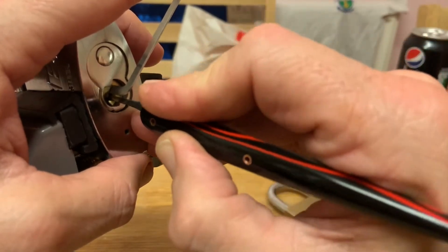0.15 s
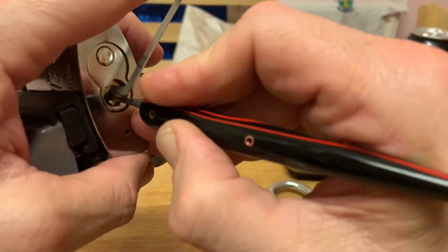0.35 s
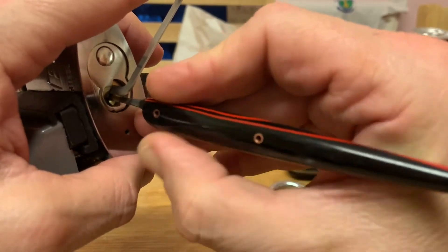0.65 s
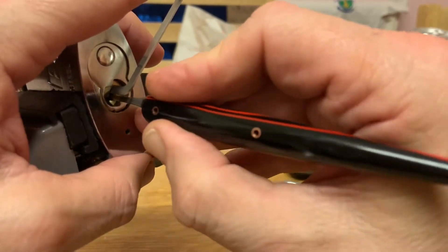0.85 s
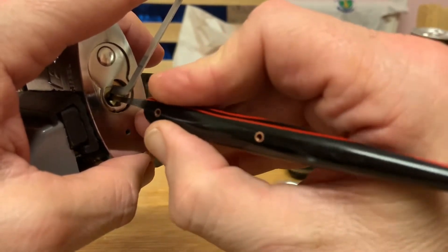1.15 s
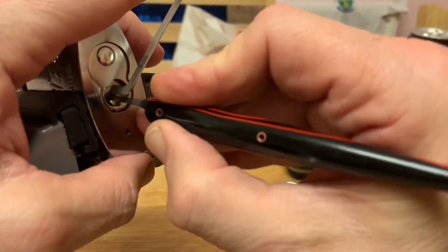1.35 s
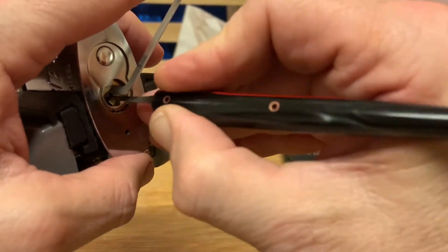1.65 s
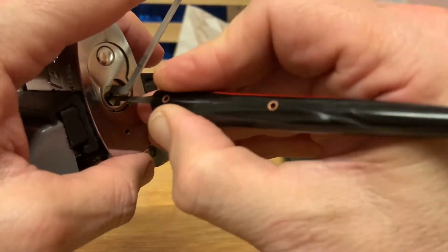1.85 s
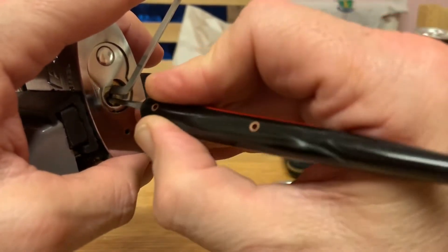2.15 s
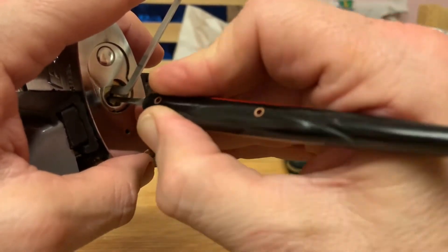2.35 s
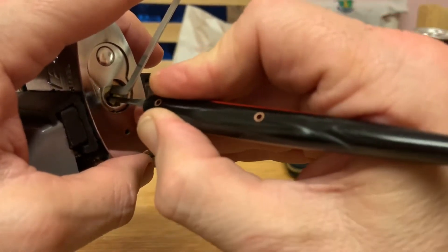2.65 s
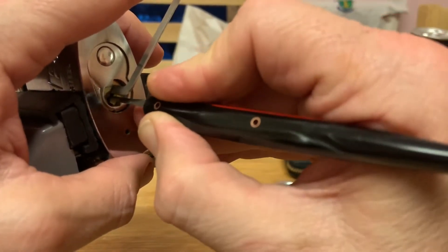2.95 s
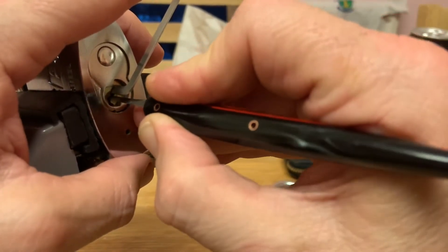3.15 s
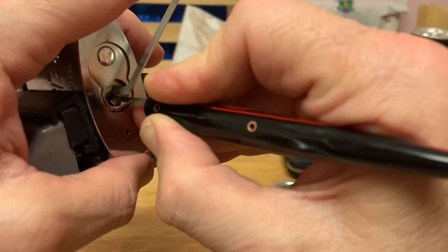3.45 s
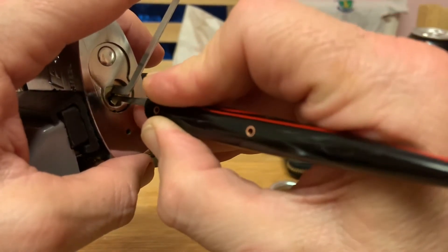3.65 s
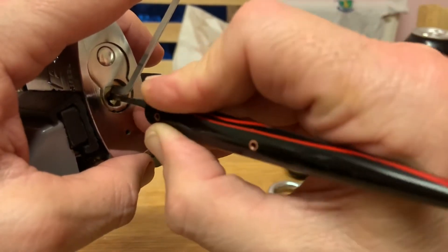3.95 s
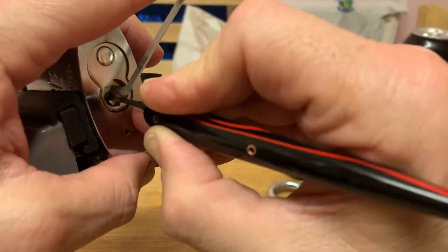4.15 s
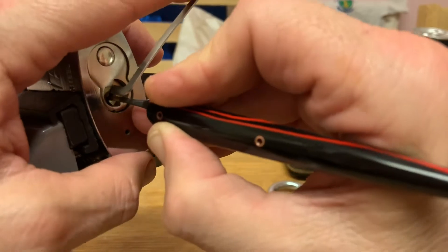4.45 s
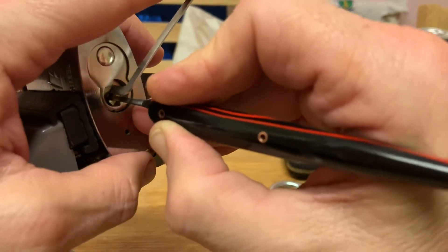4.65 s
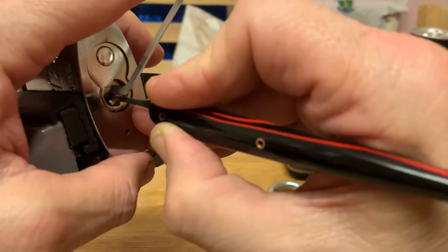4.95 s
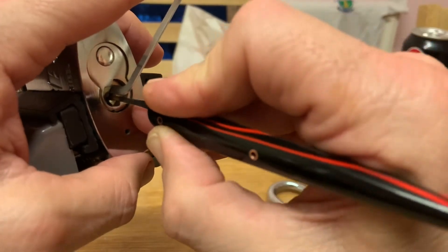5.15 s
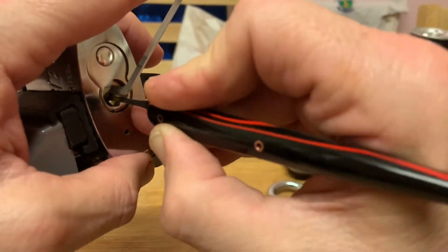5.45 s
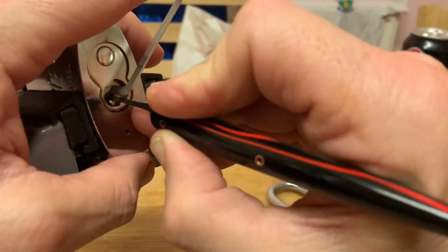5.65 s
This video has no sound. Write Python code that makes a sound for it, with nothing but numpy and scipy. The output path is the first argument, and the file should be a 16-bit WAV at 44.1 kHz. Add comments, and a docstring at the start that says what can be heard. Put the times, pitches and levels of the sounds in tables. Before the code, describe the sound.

An indoor close-up of a padlock being picked, with a constant low, airy ventilation hum that swells only slightly. For the first 1.3 s there are only very faint ticks and a hint of scraping. From about 1.5 to 1.7 s the pick scratches over the pins in a rapid cluster of bright, dry clicks, followed by a crisp, stronger snap at 1.79 s. Tiny ticks near 2.0, 2.4 and 3.2 s are almost lost in the hum. A sharp click lands at 3.55 s, then the loudest snap at 3.71 s, a hard metallic crack with a short ring of lock and shackle and a soft low bench thump. A faint scrape follows at 4.0 s, then a firm click with a hollow metal knock at 4.53 s. Mostly hum remains until a light scrape, small ticks and a tiny high metallic chirp at 5.75-5.8 s. Room reverberation is short and faint.

```python
"""Picking a padlock

A steel pick works a padlock in a vise, close to two microphone ports, the left one nearer. Pins snap and
tick as impact-excited modes, the pick scrapes as dense friction contacts, and the tension wrench chirps
once at the end by holding its modes before they decay. Jolts ring the vise and shackle, and one thump moves
the bench. An air handler hums as noise shaped by the modes of a small room."""
import sys
import numpy as np
from scipy import signal
from scipy.fft import rfft, irfft, next_fast_len
from scipy.io import wavfile
from scipy.ndimage import uniform_filter1d, map_coordinates

SR = 44100
rng = np.random.default_rng(int(sys.argv[2]) if len(sys.argv) > 2 else 0)


def dump(signal):
    """Clip the signal to [-1, 1] and save it as 16-bit WAV at the path in sys.argv[1]."""
    limited = np.clip(np.atleast_2d(signal).T, -1, 1)
    pcm = np.round(limited * 32767).astype(np.int16)
    wavfile.write(sys.argv[1], SR, pcm)


N = 256220  # length in samples
SIDES = np.array([[.5], [-.5]])  # left and right halves of a difference between the ports


def amp(db):
    """Decibel law: level in dB to amplitude ratio."""
    return 10 ** (np.asarray(db) / 20)


def along(points, hz, column=1):
    """Logarithmic frequency scale: interpolates one column of a table whose first column is f/Hz."""
    rows = np.transpose(points)
    return np.interp(np.log(hz + 1), np.log(rows[0] + 1), rows[column])


def filtered(x, response):
    """Linear filtering: multiplies the spectrum by a complex frequency response."""
    size = next_fast_len(x.shape[-1] + 8192)
    spectrum = rfft(x, size) * response(np.fft.rfftfreq(size, 1 / SR))
    return irfft(spectrum, size)[..., :x.shape[-1]]


def add(track, s, sound):
    """Superposition: adds a short sound to the track at s seconds."""
    part = track[..., round(s * SR):][..., :sound.shape[-1]]
    part += sound[..., :part.shape[-1]]


def each_unit(rows):
    """Energy normalization: scales every row to energy 1."""
    return rows / np.linalg.norm(rows, axis=-1, keepdims=True)


def ring(hz, t60, rise, t):
    """Damped mode: a sinusoid with exponential decay (t60 in s) and a soft start (rise in s)."""
    return np.sin(2 * np.pi * hz * t) * amp(-60 * t / t60) * (1 - np.exp(-t / rise))


# Diffuse sound at the two ports: f/Hz, likeness (correlation), left minus right level/dB
PORT_FIELD = [(49.87, 0.52, 2.5), (167.8, 0.93, -3.5), (340, 0.88, 1), (450, 0.14, 1.5), (650, -0.39, 5),
              (970, -0.73, 0), (1606, .3, 0.5), (3000, 0.72, 0.5), (5670, 0.32, -1), (7050, .35, -1),
              (8000, 0.91, -1), (11000, 0.98, 0), (15060, 0.94, 0)]


def at_ports(pair, alike):
    """Spatial coherence: mixes two unrelated signals to the likeness and level difference of the ports."""
    def mid_and_side(hz):
        turn = np.arccos(np.clip(along(alike, hz), -1, 1)) / 2
        return np.array([np.cos(turn), np.sin(turn)])

    mid, side = filtered(pair, mid_and_side)
    lean = lambda hz: amp(along(PORT_FIELD, hz, column=2) * SIDES)
    return filtered(np.array([mid + side, mid - side]), lean)


# Room modes that the air handler drives: f/Hz, width/Hz, spectral level/dB per Hz
ROOM_MODES = [(57, 28, -80.5), (98.9, 8.5, -72.5), (146.7, 33.4, -67), (185.3, 19.6, -63),
              (212.2, 24.5, -70), (235.5, 39.2, -71.5), (309.5, 51, -78.5), (343.7, 22, -72.5),
              (566.3, 16, -84), (609.6, 8, -82), (679.2, 12, -80.5), (732.7, 13.6, -80), (1645, 350, -95),
              (2350, 220, -96), (3300, 672, -105), (4320, 420, -107.5)]
# Air rush and far hiss: f/Hz, spectral level/dB per Hz
AIR_RUSH = [(25, -130), (33, -115), (45, -90.5), (75, -84), (380, -80.5), (450, -89.5), (900, -91.5),
            (1100, -102), (2600, -101), (3800, -114), (5200, -116), (6500, -124), (9000, -122),
            (12600, -124), (13400, -132), (14600, -133), (15600, -141)]
# Air sound at the ports: f/Hz, likeness (correlation), left lead/ms ahead of the lag in record()
VENT_FIELD = [(30, 0.85, -.4), (70, .9, -0.27), (177.8, 1, -0.56), (347, 0.82, -0.2), (455.3, 0.18, 0.37),
              (1020, 0.11, 0.21), (1630, 0.51, 0.16), (3474, 0, 0.1895), (4740, 0.7, 0.22),
              (6000, 0.35, 0.084), (7060, 0.46, -0.0082), (8450, 1, 0), (11000, 0.81, 0.028),
              (15000, 0.52, -0.21)]
# Swell of the low hum: t/s, level/dB, of which only the departure from the mean is used
HUM_SWELL = [(0.0, -49), (0.61, -50), (1.65, -49), (1.97, -50.5), (2.34, -48.5), (3.3, -50), (3.51, -47.5),
             (3.96, -51.5), (4.43, -49), (5.26, -51), (5.53, -49), (5.81, -49.5)]
HUM_TOP_HZ = 420  # the swell fades out around this frequency
PATCHY_DB = 1.53  # standard deviation of the slow gain patches


def air_handler():
    """Modal filtering of noise: patchy noise drives room modes and a broad rush; the low hum swells."""
    z = signal.stft(rng.standard_normal((2, N)), nperseg=1024)[2]
    field = rng.standard_normal(z.shape[1:])
    field = uniform_filter1d(field, size=8, axis=0)  # over frequency
    field = uniform_filter1d(field, size=10, axis=1)  # over time
    patches = amp(PATCHY_DB * field / field.std())
    pair = signal.istft(z * patches, nperseg=1024)[1][:, :N]

    def colour(f):
        modes = sum(amp(2 * db) / (1 + (2 * (f - c) / width) ** 2) ** 3 for c, width, db in ROOM_MODES)
        power = modes + amp(2 * along(AIR_RUSH, f))
        return np.sqrt(power * SR / 2)

    lead = lambda f: np.exp(2j * np.pi * f * along(VENT_FIELD, f, column=2) / 1000 * SIDES)
    air = filtered(at_ports(filtered(pair, colour), VENT_FIELD), lead)
    s, level_db = np.transpose(HUM_SWELL)
    swell = amp(np.interp(np.arange(N) / SR, s, level_db - level_db.mean()))
    low_hum = filtered(air, lambda f: 1 / (1 + (f / HUM_TOP_HZ) ** 8))
    return air + (swell - 1) * low_hum


# Bench modes: f/Hz, relative level/dB, t60/s
BENCH_MODES = [(62, -4.5, .2), (88.8, -0.5, .15), (126, 7, 0.13)]
THUMP_S, THUMP_DB = 3.72, -43  # time; level added to every bench mode


def bench():
    """Low modal response: at the hardest snap the bench top swings up slowly and dies away."""
    t = np.arange(SR // 2) / SR
    thump = sum(amp(level) * ring(hz, t60, 0.0087, t) for hz, level, t60 in BENCH_MODES)
    track = np.zeros(N)
    add(track, THUMP_S, amp(THUMP_DB) * thump)
    return track


# Slips of the tension wrench: t/s, level/dB added to every wrench mode
WRENCH_SLIPS = [(5.7965, -52), (5.7994, -30), (5.8062, -37)]
# Wrench modes: f/Hz, relative level/dB, t60/s
WRENCH_MODES = [(3118, 7.5, 0.0124), (4400, -35, 0.01)]
SLIP_HOLD_S = 0.0012  # a slip keeps driving the wrench this long


def wrench():
    """Sustained excitation, then free decay; nearer the left port than the pins, but shaded by the hand."""
    t = np.arange(SR // 20) / SR
    track = np.zeros(N)
    for s, db in WRENCH_SLIPS:
        chirp = np.zeros(len(t))
        for hz, level, t60 in WRENCH_MODES:
            held = amp(60 * np.minimum(t, SLIP_HOLD_S) / t60)  # cancels the decay during the hold
            chirp += amp(level) * held * ring(hz, t60, 0.00021, t)
        add(track, s, amp(db) * chirp)
    later = np.pad(track, (5, 0))[:N]  # 5 samples later at the right
    return np.array([amp(-3.0) * track, amp(1.0) * later])


# Rings of lock and pick: f/Hz, t60/s, rise/ms
LOCK_RINGS = [(2250, 0.0038, 0.22), (3034, 0.0097, 0.67), (3943, 0.0048, 0.55), (4510, 0.0088, 0.9),
              (5200, .005, .5), (5800, 0.005, 0.4), (6900, 0.0055, 0.4995), (7800, 0.0098, 0.18),
              (8400, .004, .15), (8990, 0.0082, .15), (9560, 0.0054, .15), (11140, 0.0062, .15),
              (11700, .004, 0.27), (12900, 0.0047, 0.16), (14200, 0.0044, 0.16), (14800, 0.0046, 0.3),
              (15270, .005, .3), (16350, .003, .2)]
DETUNE = 0.011  # spread of the rings' pitch from contact to contact (ratio)
SHORTEST_MS = .03  # no rise is quicker


def rings():
    """Modal series of energy 1 each: neighbours start in opposite sense, slightly off pitch every time."""
    t = np.arange(SR // 50) / SR
    rows = []
    for k, (hz, t60, rise_ms) in enumerate(LOCK_RINGS):
        pitch = hz * (1 + rng.normal(0, DETUNE))
        rows.append((-1) ** k * ring(pitch, t60, max(rise_ms, SHORTEST_MS) / 1000, t))
    return each_unit(np.array(rows))


# Share of each lock ring in a contact: level/dB
STRIKE_SHARES = [-30.5, -21.5, -22, -23, -15.5, -17.5, -9.5, -11, -7.5, -2, 1.5, -5, -5, -0.5, -6.5, -5,
                 -4.5, -20]
PIVOT_HZ, TOPMOST_HZ = 9400, 15200  # the tilt turns about the first; topmost rings lie above the second
STANDS_OCT = .15  # how broadly a pitch stands out, in octaves


def received(db, bright, high_hz, high_db, low_hz, low_db, top_db):
    """Modal participation: level/dB of each ring from its share, a spectral tilt and raised or cut pitches."""
    hz = np.transpose(LOCK_RINGS)[0]
    near = lambda pitch_hz: np.exp(-(np.log2(hz / pitch_hz) / STANDS_OCT) ** 2)
    tilt_db = bright * np.log2(hz / PIVOT_HZ)
    pitches_db = high_db * near(high_hz) + low_db * near(low_hz)
    return db + np.array(STRIKE_SHARES) + tilt_db + pitches_db + top_db * (hz > TOPMOST_HZ)


# Vise modes: f/Hz, relative level/dB, t60/s
VISE_MODES = [(198, -1.5, 0.046), (464.6, -9, 0.039), (700, -2, 0.024), (889, 2.5, .012),
              (1060, 3.5, 0.007), (1157, -4, 0.012), (1648, 2, 0.013), (1967, -2.5, 0.012),
              (2420, 0, 0.0076)]
# Loose shackle modes: f/Hz, relative level/dB, t60/s
SHACKLE_MODES = [(1105, -8, 0.1992), (1575, -5, 0.45), (1752, -2.5, 0.34), (1924, -4, 0.28),
                 (2362, -9.5, 0.15), (2920, -10.5, 0.38), (3410, -9, .25), (4204, -7, .25),
                 (4496, -8.5, .2), (5063, -5, 0.35), (5337, -5.5, 0.4), (6000, -7.5, .35), (6600, -6, .35)]
JOLT_DB, JOLT_GROWS = -20.5, 1  # vise energy at a contact of 0 dB; dB per dB of the contact
JOLT_LAG_S, JOLT_ROOM_DB = 0.001015, 2  # the vise answers late; its share in the room
JOLT_SPREAD_DB = 2.5  # spread of each vise mode's level from jolt to jolt
SHACKLE_DB = -6.5  # shackle energy relative to the vise's
RATTLE_HZ = 117  # new random values per second in the shackle's waver


def jolts():
    """Coupled resonance: each contact shakes vise and loose shackle in step with its own energy."""
    t = np.arange(SR // 3) / SR
    shackle_rows = np.arange(len(SHACKLE_MODES))
    out = []
    for s, _, shaken_db, _, *contact in CONTACTS:
        energy_db = 20 * np.log10(np.linalg.norm(amp(received(*contact))))
        shake = each_unit(sum(amp(level + rng.normal(0, JOLT_SPREAD_DB)) * ring(hz, t60, 0.00075, t)
                              for hz, level, t60 in VISE_MODES))
        # random gains joined by straight lines, one row per shackle mode
        places = np.meshgrid(shackle_rows, t * RATTLE_HZ, indexing="ij")
        wavers = map_coordinates(rng.standard_normal((len(SHACKLE_MODES), 100)), places, order=1)
        rattle = each_unit(sum(amp(level) * waver * ring(hz, t60, 0.00397, t)
                               for waver, (hz, level, t60) in zip(wavers, SHACKLE_MODES)))
        gain = amp(JOLT_DB + shaken_db + JOLT_GROWS * energy_db)
        near = gain * (shake + amp(SHACKLE_DB) * rattle)
        out.append((s + JOLT_LAG_S, near, gain * amp(JOLT_ROOM_DB) * shake))
    return out


# The pick drags over the pins: t/s, length/s, level/dB
PICK_SCRAPES = [(0.539, 0.043, -84.5), (0.638, .015, -97), (1.353, 0.02, -89), (1.447, 0.031, -91),
                (1.525, 0.04, -74), (1.569, .055, -72), (1.646, 0.017, -66), (4.012, 0.035, -88),
                (5.415, 0.063, -85.5), (5.747, 0.083, -75)]
# Share of each lock ring in a scrape: level/dB
DRAG_SHARES = [-15, -5.5, -4.5, -10, -8.5, -2, -11.5, -2.5, -8, -9, -1, -7, -9.5, -3.5, -9, -5.5, -10, -25]


def scrapes():
    """Friction noise: a dense run of tiny uneven contacts excites the rings of the lock."""
    out = []
    for s, length, db in PICK_SCRAPES:
        t = np.arange(round(length * SR)) / SR
        uneven = uniform_filter1d(rng.standard_normal(len(t)), size=40) * np.sqrt(40)
        grit = rng.standard_normal(len(t)) * amp(3.5 * uneven)
        stroke = np.sin(np.pi * t / length) ** .5
        drag = amp(db) * signal.fftconvolve(grit * stroke, amp(DRAG_SHARES) @ rings())
        out.append((s, drag, drag))
    return out


# Contacts of pick and pins: t/s, rise/ms, vise shaken level/dB, room share level/dB, common ring level/dB,
# brightness/dB per octave, high pitch f/Hz, its level/dB, low pitch f/Hz, its level/dB, topmost rings level/dB
CONTACTS = [(0.349, 0.2, 0, 0, -52.5, -5, 7710, 7, 4000, -1, -6),
            (0.5681, 0.2, -2, 0, -61, -6.2, 9000, 0, 3720, 12, -3),
            (0.792, 0.2, 2, 0, -67, -5, 12000, 6, 4000, -2, -6),
            (0.8383, 0.2, 0, 0, -60, -10, 9500, 0, 4810, 8, -6),
            (1.3689, 0.2, 0, 0, -59.5, -2.5, 14680, 8, 4030, 0, -3),
            (1.5355, 0.18, 0.5, 0, -41.5, -6, 9500, -2.5, 6000, 23, -3),
            (1.536, 0.1, 1, 2, -37, -5, 11000, 16, 6850, 3, 7),
            (1.5525, 0.2, -2, 0, -48, -7.5, 9500, -0.5, 6420, 19, -6),
            (1.567, 0.4, -1.5, -1, -23.5, 1.5, 11200, 0, 6130, 19.5, -0.5),
            (1.595, 0.23, -12, -1, -55, -2.5, 9500, 0, 5220, 8.5, -3),
            (1.6011, 0.46, 1.5, 0.5, -36, 0, 15400, 1, 6000, 2.5, 4),
            (1.6147, 0.92, -1, 0.5, -33.5, -2, 11400, 5.5, 6680, 10.5, -5),
            (1.6494, 0.2, 0, -1, -38, 0.5, 9600, 2, 6600, 6.5, -6),
            (1.6555, 0.17, -3, -4, -20, 0.5, 9500, 5, 3300, -5, -7.5),
            (1.6585, 0.38, -1, -5, -33.5, -1, 14800, 4.5, 5600, 27, -1.5),
            (1.6661, 0.2, 1.5, 0.5, -45.5, -4.5, 9500, 0, 7380, 7, -6),
            (1.7875, 0.3, -1.5, 1, -57, -2.5, 9500, 5, 3980, 0, -4),
            (1.7924, 0.087, -4.5, 1.5, -12.5, 2, 12900, 3, 8400, 8.5, -2.5),
            (2.0056, 0.2, -3, 1, -53.5, -13.5, 11850, 12, 4000, 6, -2.5),
            (2.0516, 0.2, 1, 0, -58, -10, 10870, 5, 4000, 0, -3),
            (2.3733, 0.2, 0, 0, -61, -10, 11940, 13, 4000, -2, -3),
            (3.169, 0.1, 0, 0, -53.5, -2, 12440, 16, 5000, -6, -12),
            (3.5514, 0.13, 2, 0.5, -21.5, -5, 11400, 10, 3883, -9, 12.5),
            (3.562, 0.2, 1, 0, -44, -4.5, 11700, 16.5, 4000, 0.5, -3.5),
            (3.71, 0.44, 0.5, -1.5, -2, 2, 11200, 5, 6950, 3, -3.5),
            (3.7111, 0.1, -2, 0.5, -5.5, -3.5, 12900, 7, 3000, -2, -2.5),
            (3.7113, 0.2, -2, 0, -4.5, 0, 9300, 5, 4010, 2.5, -2.5),
            (3.7136, 0.092, -2.5, -0.5, -10, 2.5, 14700, -3.5, 5740, -0.5, 6),
            (4.0251, 0.2, 0, 0, -62, -6, 10420, 9, 4000, 0, -3),
            (4.0315, 0.2, 0, 0, -57, -5, 9500, 0, 3880, 20, -3),
            (4.5254, 0.24, 11.5, 2, -27.5, -6, 11100, -1, 6900, -1, -4),
            (4.5312, 0.24, -9, 0, -13, 2.5, 11720, -7, 3697, 9, 17),
            (5.4576, 0.2, 1, 0, -56.5, -12, 9500, -5, 6000, 12, -3),
            (5.7533, 0.57, 1.5, 0, -43.5, 3, 14600, 1, 8000, 6, -8),
            (5.7605, 0.4, 3, 0, -57.5, -3, 9500, -3, 7800, 22, -6),
            (5.777, 0.5, 4, -2, -41.5, -3, 14800, 8, 4500, 19, -5.5),
            (5.8001, 0.2, -6, 0, -47, -6, 14600, 12, 4400, 6, -1),
            (5.8022, 0.3, -6, -2, -49, 0, 12600, 14, 4400, 0, -6),
            (5.8068, 0.3, -6, 0, -42, -13, 9500, 12, 6400, 3, -6)]
FALL_S = .0005  # time constant of the chatter's decay
LANDING_MS = .8  # landing blow relative to the chatter, multiplied by the rise


def clicks():
    """Impact excitation: pins snap past the shear line and the pick taps them with chatter and one blow.

    Returns (s, sound at the ports, sound spread through the room), the latter without the chatter."""
    t = np.arange(-150, 120) / SR
    out = []
    for s, rise_ms, _, room_db, *contact in CONTACTS:
        lock, gains = rings(), amp(received(*contact))
        quick_ms = max(rise_ms, SHORTEST_MS)
        envelope = np.exp(np.where(t < 0, 1000 * t / quick_ms, -t / FALL_S))
        chatter = envelope * rng.standard_normal(len(t))
        chatter[t == 0] = LANDING_MS / quick_ms  # a quicker rise makes the blow stand out more
        near = each_unit(signal.fftconvolve(lock, [chatter], axes=1))
        out.append((s + t[0], gains @ near, amp(room_db) * gains @ lock))
    return out


# Room tail: f/Hz, t60/s, level/dB
ROOM_DECAY = [(300, 0.46, -16.5), (1470, 0.25, -4), (2970, 0.75, -12), (5130, 0.28, -6), (6400, .45, -13.5),
              (8000, 0.27, -21.5), (8914, 0.33, -18), (11000, 0.344, -21), (12700, 0.3, -20),
              (13980, 0.27, -19), (15710, 0.21, -23.5), (16600, 0.1922, -44)]
# The lock's sound toward the two ports: f/Hz, further left lead/rad, left minus right level/dB
LOCK_FACING = [(300, 0, 0), (800, .8, 3), (1600, -.4, 3), (2200, -2.4, 0), (3000, -5.8, -2),
               (3900, -6.3, -4), (4500, -6.4, -4), (5100, -5.3, 0), (5900, -7.5, -2), (6300, -11.6, -3),
               (6900, -12.2, 0), (7500, -4 * np.pi, 0), (13300, -4 * np.pi, 0), (15000, -11.4, 0),
               (16000, -11.1, 0), (17000, -10.3, 0)]
ROOM_BUILDS_S = 0.0081  # time constant with which the room's answer fills in


def room_tail():
    """Reverberant decay: noise at both ports builds up, then dies at each frequency's own speed."""
    hz, t, z = signal.stft(rng.standard_normal((2, SR // 2)), SR, nperseg=256)
    t60 = along(ROOM_DECAY, hz)[:, None]
    decay = amp(along(ROOM_DECAY, hz, column=2)[:, None] - 60 * t / t60)
    build = 1 - np.exp(-t / ROOM_BUILDS_S)
    z = z * decay * build / np.sqrt(t60 * SR / np.log(1e6))  # evens out the energy of long and short decays
    return at_ports(signal.istft(z, SR, nperseg=256)[1], PORT_FIELD)


def echoed(sounds):
    """Direct and reverberant fields: directional sound at the ports, then a new room tail for each sound."""
    direct, track = np.zeros(N), np.zeros((2, N))
    for s, near, spread in sounds:
        add(direct, s, near)
        add(track, s + 0.0025, signal.fftconvolve(spread[None], room_tail(), axes=1))

    def facing(hz):
        phase = np.exp(1j * along(LOCK_FACING, hz) * SIDES)
        return phase * amp(along(LOCK_FACING, hz, column=2) * SIDES)

    return track + filtered(direct, facing)


def scene():
    """Superposition of lock, vise, bench and wrench over the hum."""
    lock = echoed(clicks() + scrapes() + jolts())
    return lock + bench() + wrench() + air_handler()


# Further left lag in the treble: f/Hz, phase/rad
TREBLE_SHADE = [(7000, .1), (8300, 0.65), (11000, 0.81), (13000, 1.1), (15500, 3.5)]
# the left port leads up to the turning frequency; above it the delay turns round
LEAD_S, TURN_HZ, LAG_S = 11.6 / 44100, 7000, 8 / 44100


def left_lag(hz):
    """Interaural-type phase difference: radians by which the left port lags the right."""
    lead = LEAD_S * np.minimum(hz, TURN_HZ)
    lag = LAG_S * np.maximum(hz - TURN_HZ, 0)
    return 2 * np.pi * (lag - lead) + along(TREBLE_SHADE, hz)


EDGE_HZ, TOP_HZ = 16400, 17300  # the band limit starts and ends here


def record(dry):
    """Phase difference and band limitation: the ports hear at different moments, with nothing above TOP_HZ."""
    lag = lambda hz: np.exp(-1j * left_lag(hz) * SIDES)
    edge = lambda hz: np.cos(np.pi / 2 * np.clip((hz - EDGE_HZ) / (TOP_HZ - EDGE_HZ), 0, 1)) ** 2
    return filtered(dry, lambda hz: lag(hz) * edge(hz))


dry = scene()
out = record(dry)
dump(out)
```